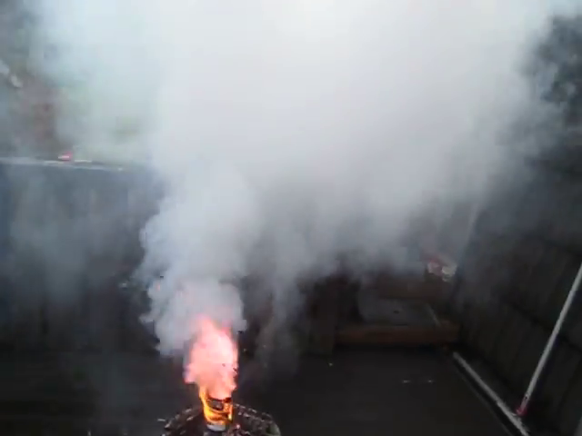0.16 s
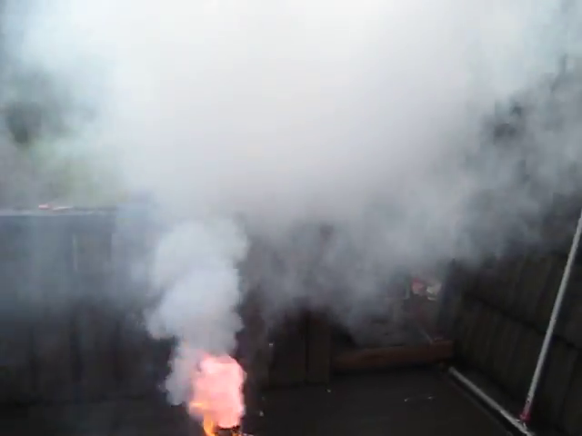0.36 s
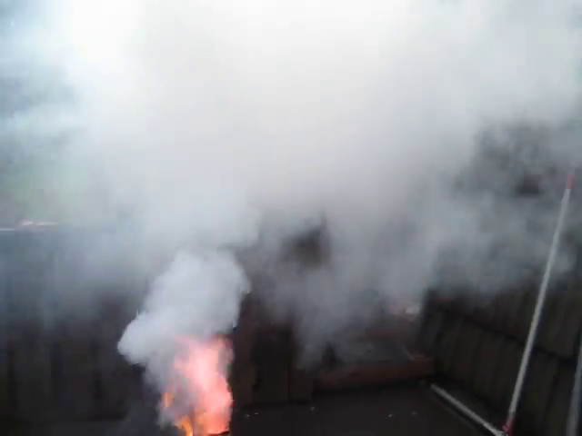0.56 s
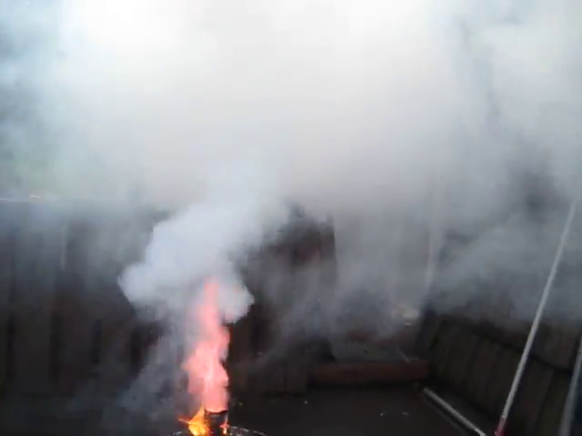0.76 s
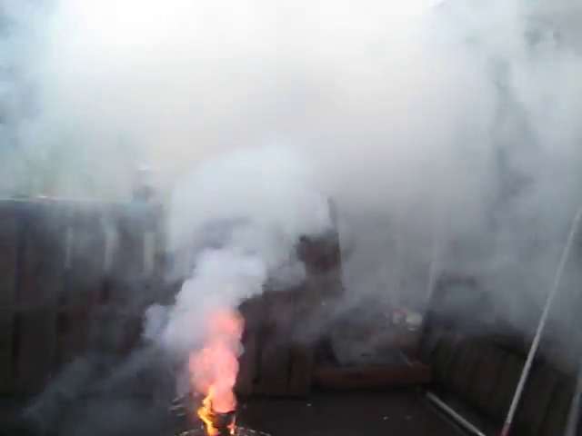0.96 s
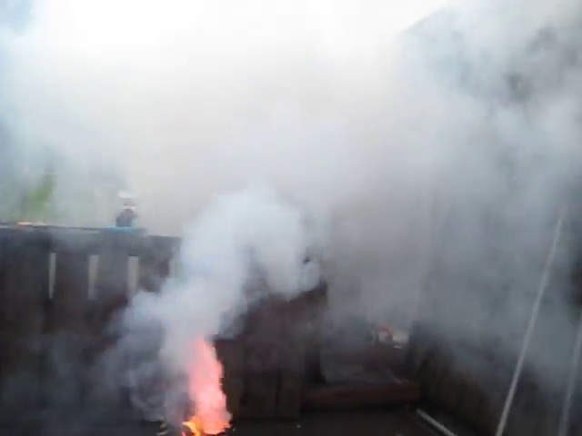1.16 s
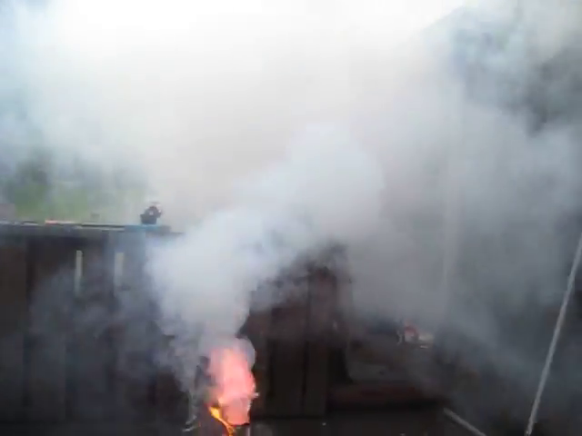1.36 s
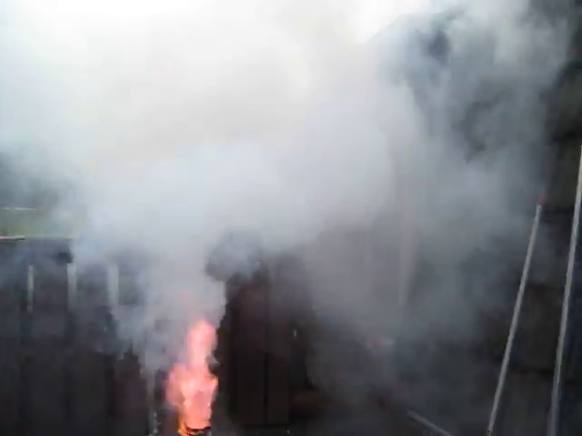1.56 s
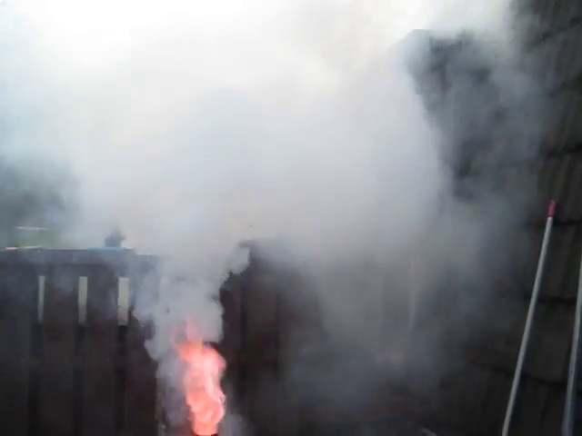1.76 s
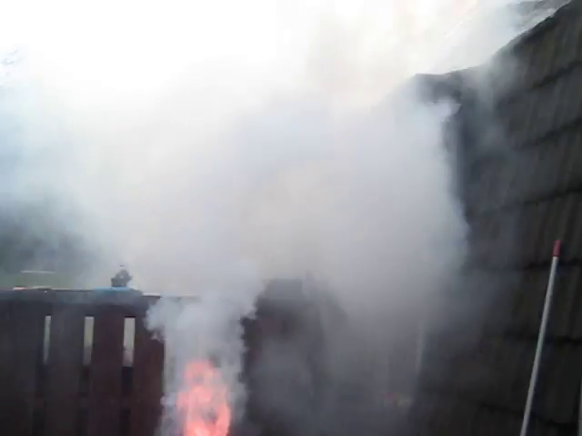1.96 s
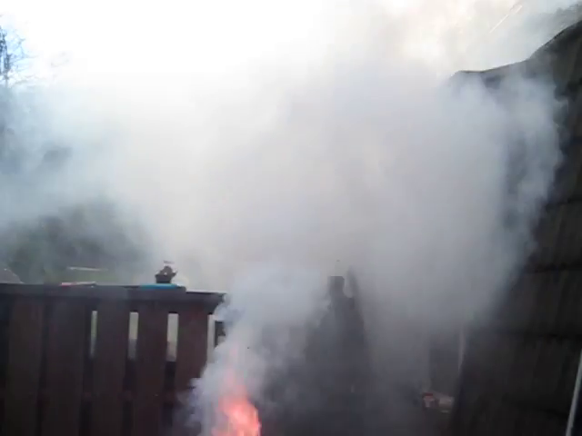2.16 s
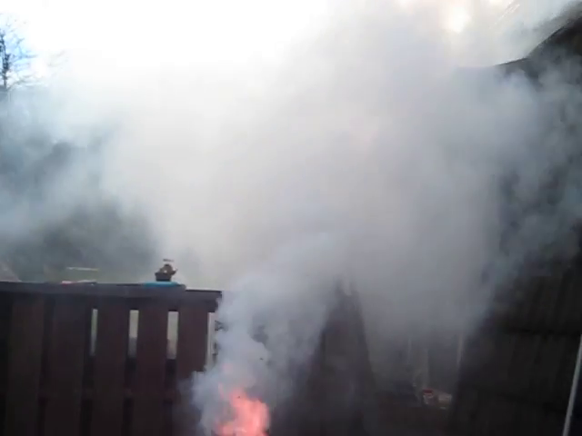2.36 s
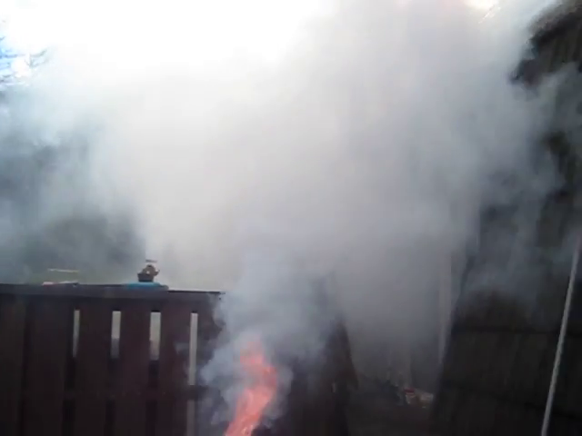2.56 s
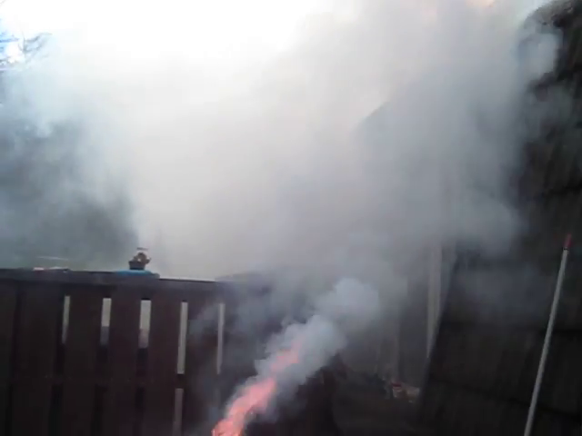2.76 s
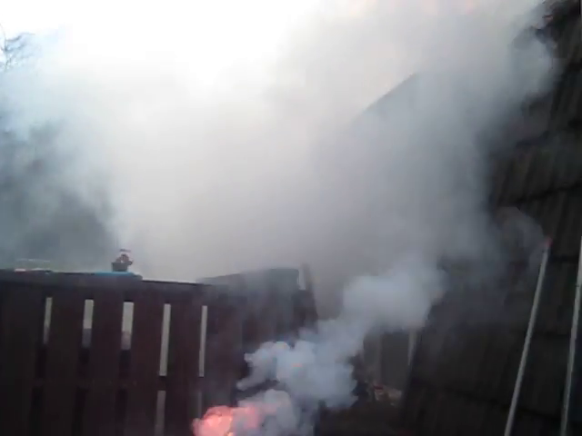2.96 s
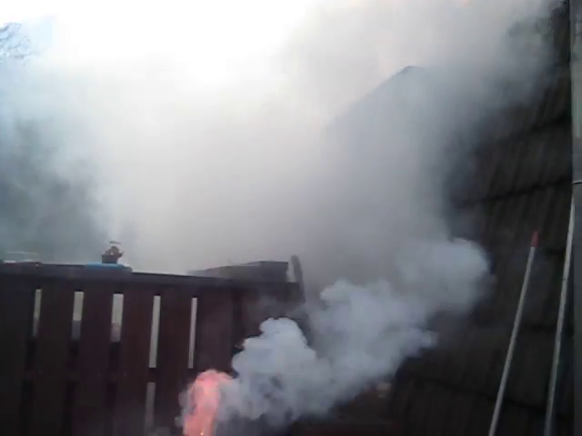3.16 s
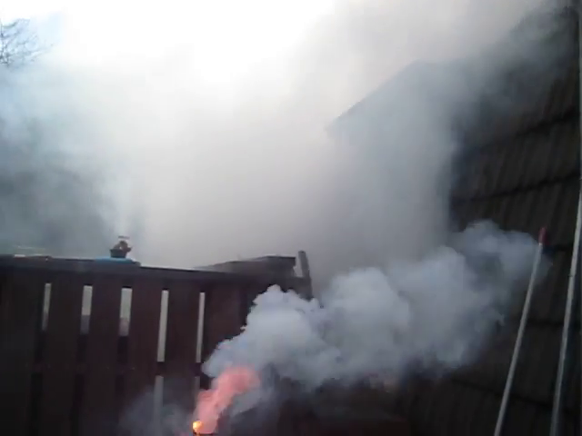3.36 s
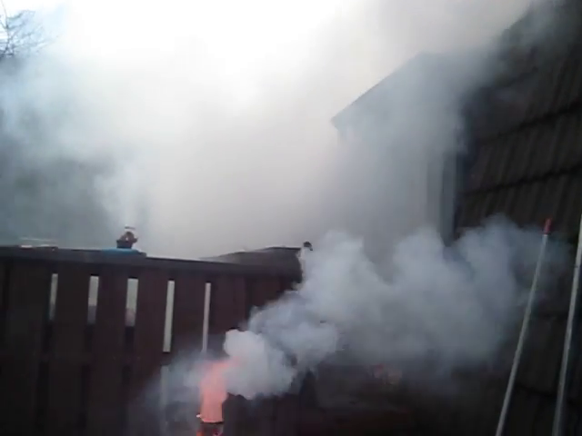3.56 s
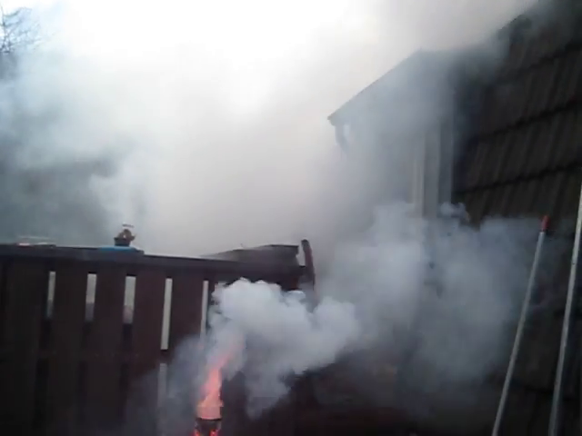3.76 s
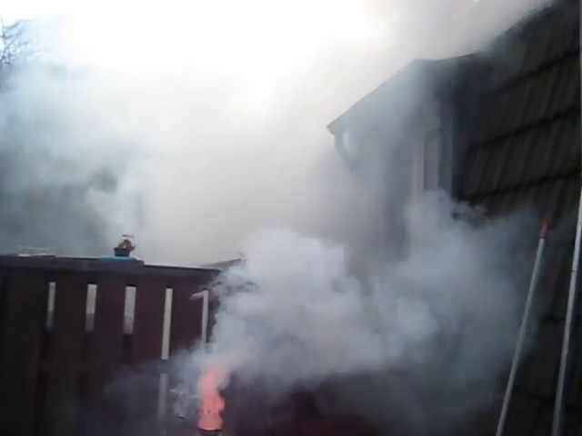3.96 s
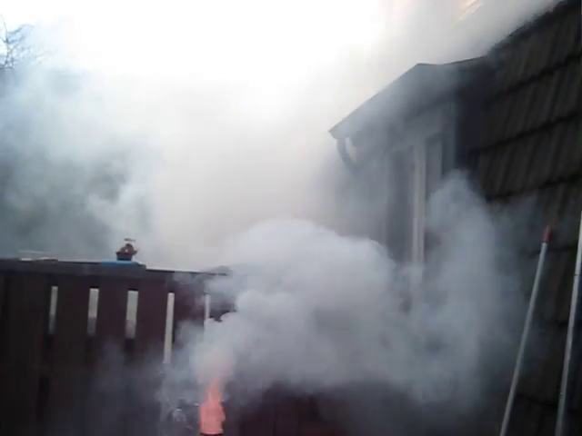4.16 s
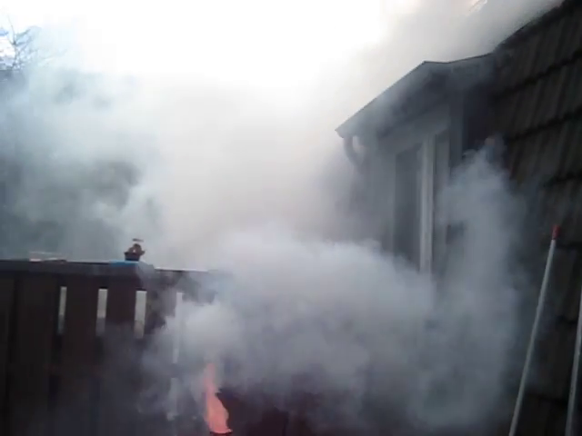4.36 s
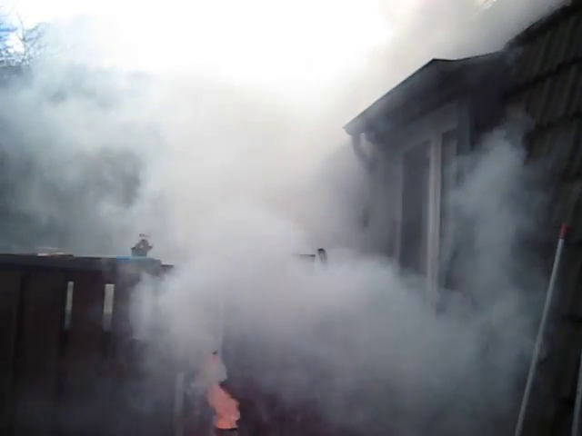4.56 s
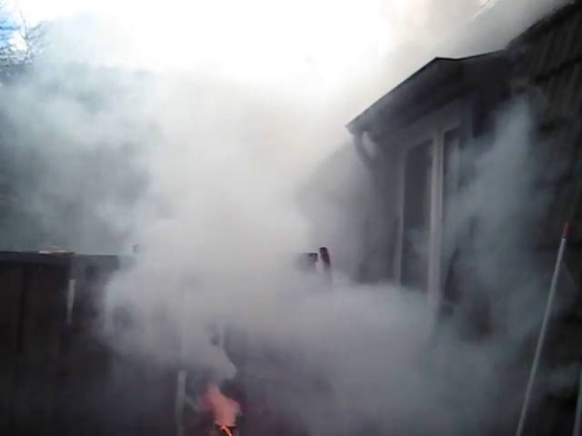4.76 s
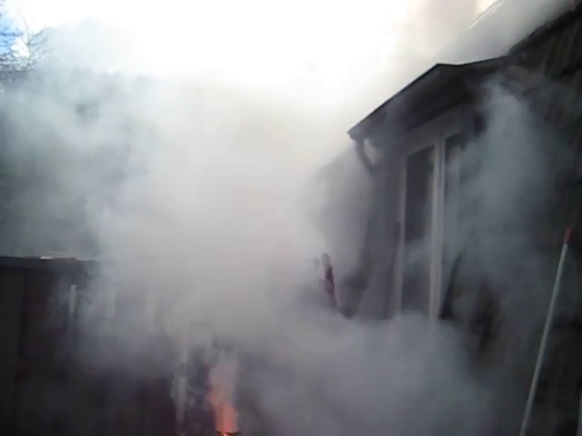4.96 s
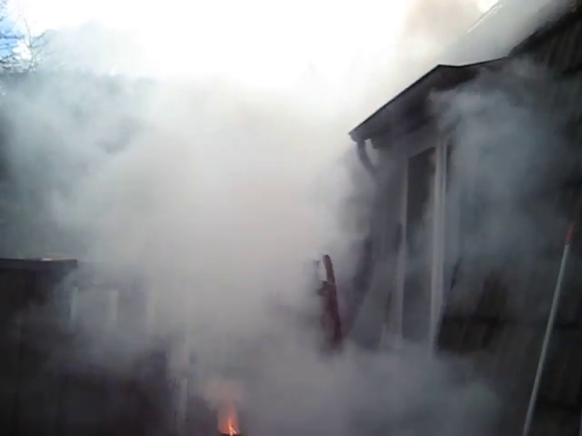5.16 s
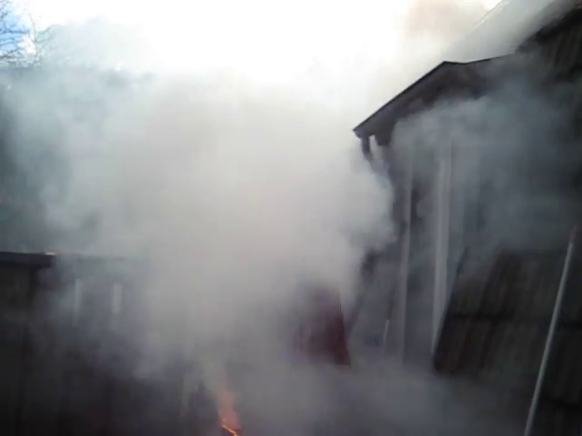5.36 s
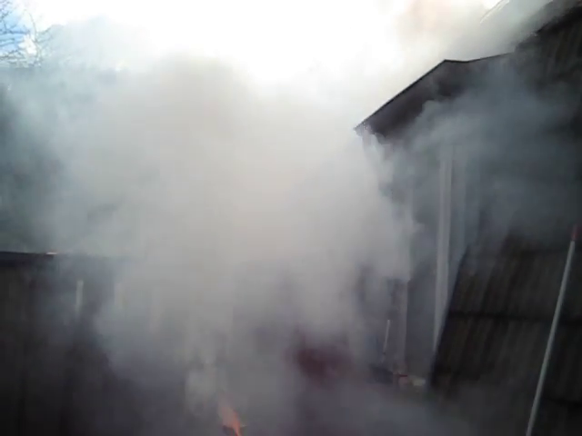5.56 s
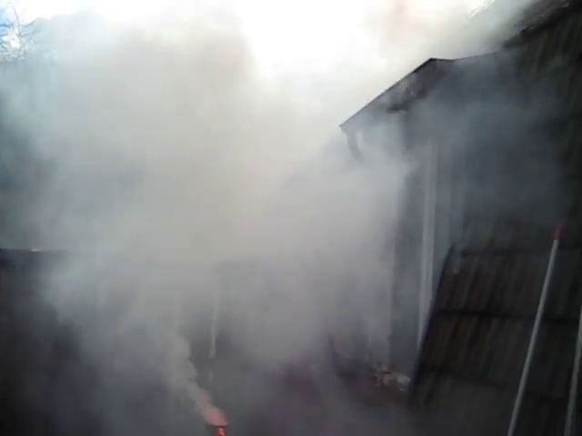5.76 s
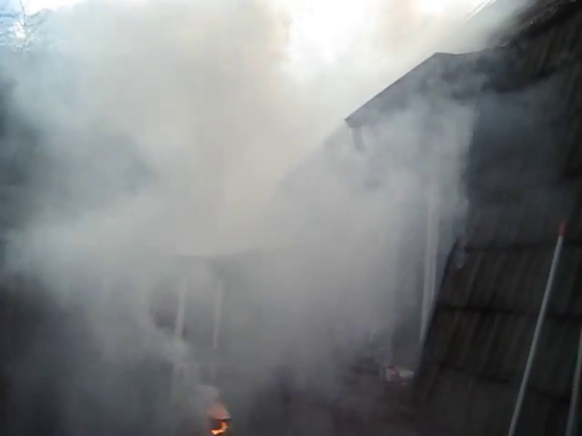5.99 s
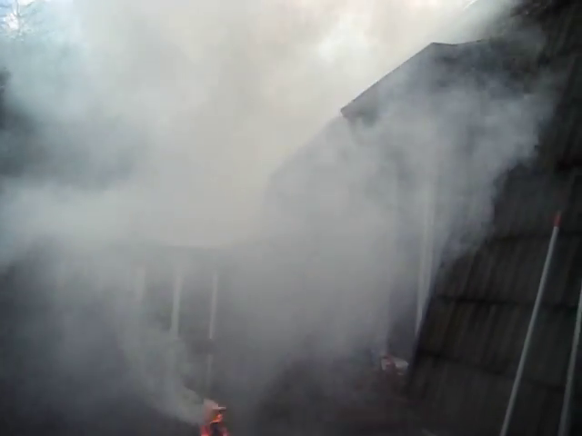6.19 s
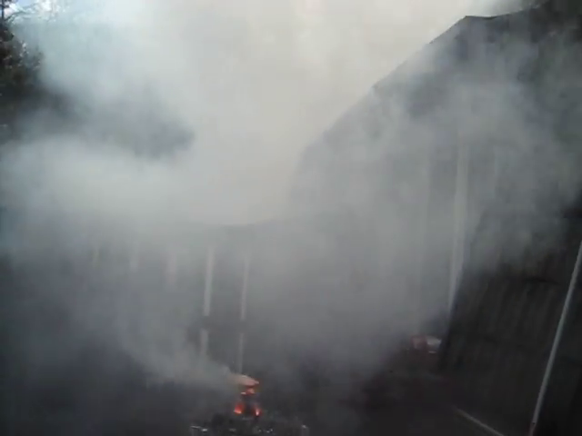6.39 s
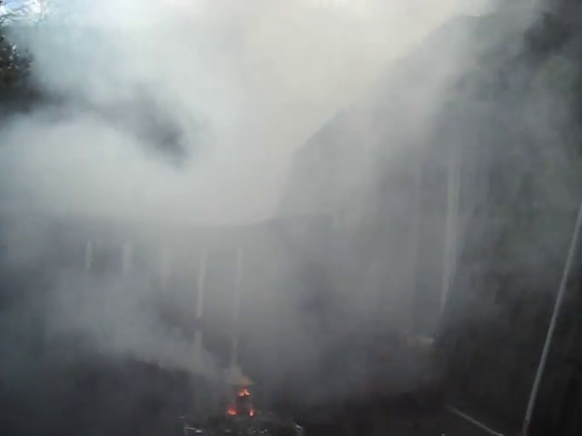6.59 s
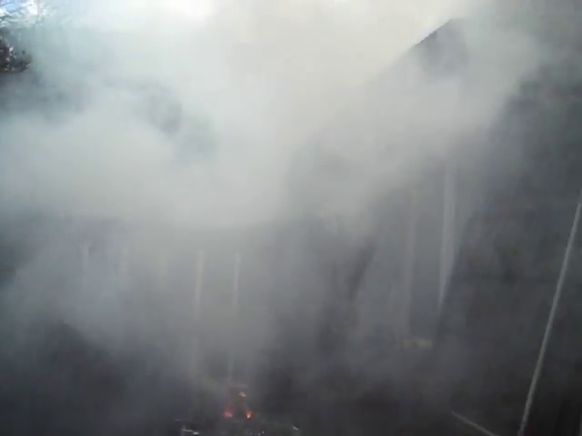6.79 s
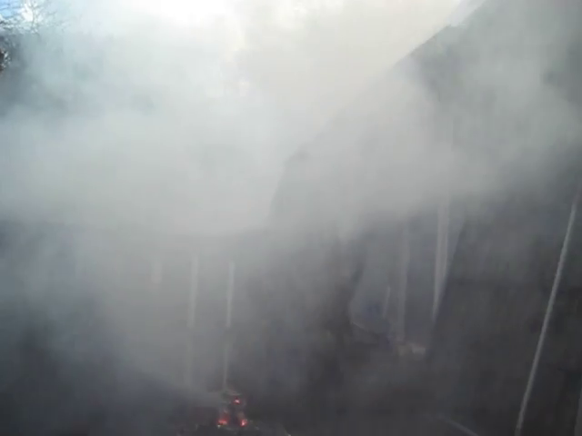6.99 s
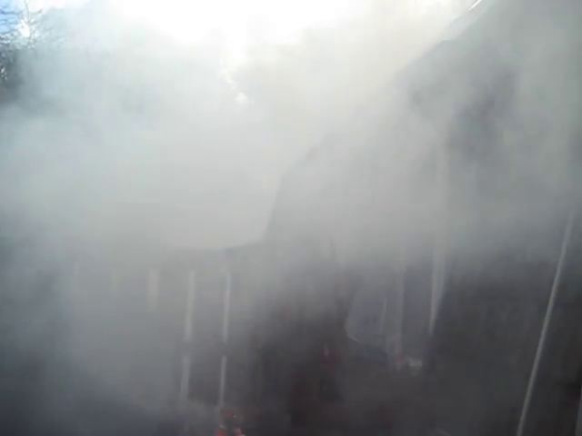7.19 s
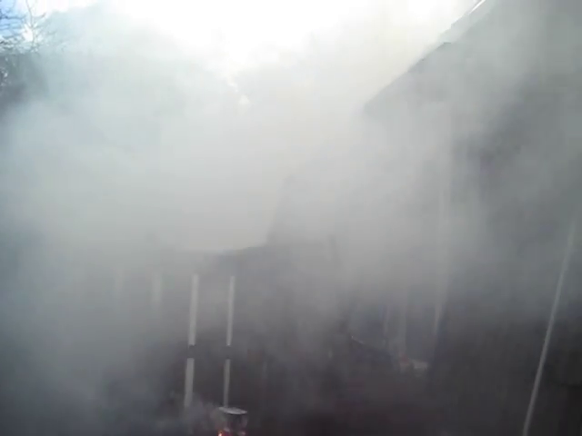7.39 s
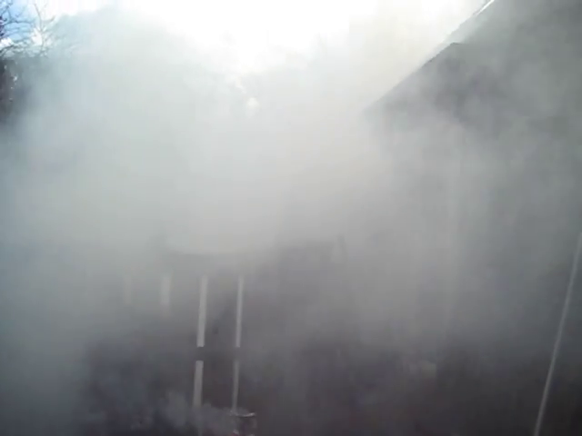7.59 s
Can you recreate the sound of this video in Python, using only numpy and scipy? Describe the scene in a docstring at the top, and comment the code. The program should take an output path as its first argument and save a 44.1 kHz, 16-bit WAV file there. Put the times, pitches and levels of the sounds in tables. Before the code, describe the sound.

Smoke mixture roars in a tin can with steady gritty hissing and hollow pops, then dies down as fingers clatter on the camera.

```python
"""A jet of hiss full of fine crackle, with single pops: a smoke mixture burns in a tin can in a small walled yard.
The jet is shaped noise plus dense tiny bursts; each pop rings a set of short modes. The flame sinks, bobs up
again and finally dies down. Floor, fence and wall throw quick echoes back. Fingers knock the hand-held camera
and ring its case; low puffs and thuds, gusts of wind and a late low creak stand over a distant hum.
The camera limits its peaks."""
import sys
import numpy as np
from scipy import signal
from scipy.io import wavfile
from scipy.ndimage import uniform_filter1d

SR = 44100
rng = np.random.default_rng(int(sys.argv[2]) if len(sys.argv) > 2 else 0)


def file_out(sig):
    """Save sig as 16-bit WAV at sys.argv[1]."""
    # one column per channel
    cols = np.atleast_2d(sig).T
    # limit, then scale
    lim = np.clip(cols, -1, 1)
    pcm = np.round(lim * 32767).astype(np.int16)
    wavfile.write(sys.argv[1], SR, pcm)


N = 336483

# finger touches on the camera: start_s, level_db, softness_db_per_octave, low_mode_weight_db
TOUCHES = [(0.3263, -18.5, 2, -6), (5.9249, 3, -5, -31), (5.9337, -10, -7, -15), (5.9383, -7, -4, -19),
           (5.95, -5, -4, -9), (5.9553, -9, -3.5, -1), (5.98, -14, -2, -17), (5.989, -17.5, 1, -2),
           (5.999, -5, 3, -21), (6.0144, -9, 0, -32), (6.0267, -21, -3, -24), (6.0738, -20.5, 10, -18),
           (6.3254, -0.7, 2, -17), (6.3394, -5.5, 1, -27), (6.347, -11, -2.5, -19), (6.3534, -15, 11, -22),
           (6.383, -10.5, 4, -7), (6.3917, -16.5, 6, -9), (6.632, -9.5, 3, -2), (6.643, -10.5, -1.5, -19),
           (6.6527, -11, 1.5, -6), (6.665, -15, 5, -10), (7.5949, -8.5, 3, -6), (7.6061, -22, 9, -2)]


def gain_of(db):
    """dB to gain."""
    return 10 ** (np.asarray(db) / 20)


def evened(x):
    """Scales to rms 1."""
    return x / np.sqrt(np.mean(x ** 2) + 1e-20)


def read(points, hz):
    """Interpolates a table over log frequency."""
    f, value = np.transpose(points)
    return np.interp(np.log(hz + 1), np.log(f + 1), value)


def add(mix, s, sound):
    """Adds a sound at time s."""
    part = mix[round(s * SR):][:len(sound)]
    part += sound[:len(part)]


def bell(x, middle, half_width):
    """Gaussian bump of height 1."""
    return np.exp(-((x - middle) / half_width) ** 2)


def band_filtered(x, order, edges, kind):
    """Butterworth filter with edges in Hz."""
    return signal.lfilter(*signal.butter(order, edges, kind, fs=SR), x)


def shaped(x, field_db, size):
    """Gives x a gain field_db(hz, s) over frequency and time."""
    overlap = size * 3 // 4
    hz, t, z = signal.stft(x, SR, nperseg=size, noverlap=overlap)
    z = z * gain_of(field_db(hz[:, None], t))
    return signal.istft(z, SR, nperseg=size, noverlap=overlap)[1][:len(x)]


def drift(shape, sizes):
    """Smooth random variation of rms 1, averaged twice along each axis given a size."""
    z = rng.standard_normal(shape)
    for axis, size in enumerate(sizes):
        z = uniform_filter1d(uniform_filter1d(z, size, axis=axis), size, axis=axis)
    return evened(z)


def ring(modes, soft_db, flip=1):
    """Sum of decaying modes; softness favours the low ones; a negative flip alternates their signs."""
    hz, mode_db, t60_s = np.transpose(modes)[:, :, None]
    t = np.arange(1800) / SR
    level = gain_of(mode_db - soft_db * np.log2(hz / 1200) - 60 * t / t60_s)
    sign_and_weight = flip ** np.arange(len(modes))[:, None]
    return (sign_and_weight * level * np.sin(2 * np.pi * hz * t)).sum(0)


def wind(lumpy_db=3.5, calm_db=-62.5, air_db=-48.5):
    """A lumpy low rumble in gusts, short sine pulses as puffs, thuds and creak, and the hum of the open air."""
    # wind rumble spectrum: pitch_hz, level_db
    rumble_spectrum = [(15, 1), (40, 1), (100, 5.5), (200, 6), (400, -4.5), (800, -51)]
    # distant outdoor hum spectrum: pitch_hz, level_db
    air_spectrum = [(15, -46), (25, -26), (199, 0.5), (264, -5), (357, -2), (469, -2), (650, -10),
                    (840, -21), (1430, -120)]
    # gusts: middle_s, half_length_s, level_db
    gust_table = [(0.046, 0.31, -43), (0.368, .2, -40.5), (1.3, 0.79, -52), (2.196, 0.32, -45),
                  (2.9, 0.36, -49), (3.55, 0.19, -57), (6.35, .15, -47)]
    # low puffs and thuds; from 6.15 to 6.24 s a low creak: start_s, level_db, pitch_hz, length_cycles
    low_pulses = [(0.241, -22, 109, 1.2), (0.471, -22, 170, 1.2), (.568, -27, 106, 2.4),
                  (1.359, -32, 80.7, 1), (2.08, -28, 170, 1.9), (2.158, -28, 180, .98),
                  (2.248, -26, 148, 1.2), (2.949, -28, 135, 1.1), (3.217, -28, 128, 0.87),
                  (6.149, -29, 231, 1.1), (6.188, -26, 144, 1.2), (6.207, -21, 182, 3.8),
                  (6.2278, -18.5, 260, 1.2), (6.233, -17.5, 151, 1.2)]
    t = np.arange(N) / SR
    rumble = evened(shaped(rng.standard_normal(N), lambda hz, t: read(rumble_spectrum, hz), size=4096))
    lumps = drift(N, [900])
    gusts = gain_of(calm_db) + sum(gain_of(db) * bell(t, mid, half) for mid, half, db in gust_table)
    out = rumble * gusts * gain_of(lumpy_db * lumps)
    hum = evened(shaped(rng.standard_normal(N), lambda hz, t: read(air_spectrum, hz), size=2048))
    out += gain_of(air_db) * hum
    for s, db, hz, cycles in low_pulses:
        turns = np.arange(0, cycles, hz / SR)
        add(out, s, gain_of(db) * np.sin(2 * np.pi * turns) * np.sin(np.pi * turns / cycles))
    return out


def jolts(jolt_db=-25, per_soft_db=1.88, jolt_s=.0012):
    """Each touch shakes the microphone itself: one low push and return, no ring, stronger for a soft touch."""
    out, u = np.zeros(N), np.arange(0, 8, 1 / (jolt_s * SR))
    push = u * np.exp(1 - u) * (1 - u / 2)
    for s, db, soft_db, _ in TOUCHES:
        add(out, s, gain_of(db + jolt_db + per_soft_db * soft_db) * push)
    return out


def knocks(crack_db=-21.0, scrape_db=-13.0, scrape_decay_s=.002, crack_decay_s=.00041):
    """Each touch is a blow with a scraping trail that rings the plastic case, plus a short noisy crack."""
    # case modes: pitch_hz, level_db, t60_s
    case_modes = [(332, 10, 0.014), (473, 15, 0.033), (625, -10.5, 0.0071), (870, -3, 0.014),
                  (910, 10, 0.018), (1170, 2.5, 0.018), (1660, 1, 0.0056), (2566, -9, 0.029),
                  (3650, -3.5, 0.0048), (4300, -3, 0.0059), (4560, -2.5, 0.0017)]
    out, t = np.zeros(N), np.arange(600) / SR
    noises = rng.standard_normal((len(TOUCHES), 600))
    for (s, db, soft_db, weight_db), noise in zip(TOUCHES, noises):
        touch = (t == 0) + gain_of(scrape_db) * noise * np.exp(-t / scrape_decay_s)
        # the grip weights the lowest modes
        modes = [(hz, mode_db + weight_db * (hz < 700), t60_s) for hz, mode_db, t60_s in case_modes]
        sound = np.convolve(touch, ring(modes, soft_db, flip=-1.07))
        sound = gain_of(db) * sound / abs(sound).max()
        crack = gain_of(db + crack_db - 2.1 * soft_db) * noise * np.exp(-t / crack_decay_s)
        add(sound, 0, crack)
        add(out, s, sound)
    return out


def yard(x, wet_db=-3.5, wall_ms=5.3, wall_share=0.34):
    """One clear slap from the wall, then sparse taps of random sign, each band dying at its own speed."""
    # yard decay: pitch_hz, t60_s
    decay_times = [(300, 0.79), (1000, 0.1), (3000, 0.17), (8000, 0.14), (16000, 0.15)]
    taps = np.zeros(SR // 2)
    at = np.arange(320, len(taps) - 20, 20)  # one tap in every 20 samples
    taps[at + rng.integers(0, 20, len(at))] = rng.choice([-1., 1.], len(at))
    tail = shaped(taps, lambda hz, t: -60 * t / np.maximum(read(decay_times, hz), .02), size=256)
    slap = wall_share * np.sinc(np.arange(len(tail)) - wall_ms * SR / 1000)
    response = gain_of(wet_db) * tail / np.linalg.norm(tail) + slap
    return signal.fftconvolve(x, response)[:N]


def near_echoes(x, echo_hz=6000, bottom_ms=0.373):
    """Floor, can bottom, fence and wall send back delayed, duller copies."""
    # shortest echoes, shifting as the camera moves: time_s, floor_ms, floor_share, can_bottom_share
    moving_paths = [(0, 1.18, .15, 0.064), (.65, 0.92, 0.1, 0.13), (.8, 1.48, 0.16, 0.067),
                    (1.35, 1.18, 0.17, -0.013), (1.7, 1.18, 0.16, -0.14), (2.3, 1.12, 0.28, 0.082),
                    (3.3, 1, 0.15, 0.19), (3.9, 1.047, 0.15, 0.059), (5.8, 1.064, 0.15, -0.12),
                    (6.4, 1.01, .22, -0.17), (7.63, 0.87, 0.32, -0.2)]
    # fence and wall: delay_ms, pressure_share
    fixed_paths = [(5.85, -0.0084), (6.58, -0.063), (6.8, 0.22), (7.01, -0.15), (7.96, -0.16),
                   (8.12, 0.061), (9.14, 0.0077), (10.41, -0.31), (10.6, 0.03), (12.05, 0.1)]
    s, *columns = np.transpose(moving_paths)
    t = np.arange(N) / SR
    floor_ms, floor_share, bottom_share = (np.interp(t, s, c) for c in columns)
    copies = floor_share * np.interp(t - floor_ms / 1000, t, x)
    copies += bottom_share * np.interp(t - bottom_ms / 1000, t, x)
    for ms, share in fixed_paths:
        copies += share * np.interp(t - ms / 1000, t, x)
    return x + band_filtered(copies, 1, echo_hz, "lowpass")


def pops(small_count=14, small_from_s=5.5, small_db=-28, small_spread_db=1, small_soft_db=6.0, small_spit_db=-21):
    """Each burst rings short modes with a spit of noise; faint random pops come late as the fire dies."""
    # pops in the can, and at 5.998 s a sharp tick on the camera case:
    # start_s, level_db, softness_db_per_octave, spit_db
    pop_table = [(0.125, -10, -12, -3), (0.1761, 3, -5, -31), (0.218, -9, -11, -1), (.268, -19, -7, -20),
                 (.307, -10, -8, -3), (.461, -21, -8, -7.5), (0.538, -14, -1, -8), (.572, -10, -12, -2),
                 (.677, -8, 1, -1), (.685, -15, -1, -12.5), (.717, -9.5, -9, -2), (.948, -3.5, -6, -8),
                 (1.093, -7, -3, -7.5), (1.165, 0, -16, -15), (1.197, -22, -17, 12.5),
                 (1.667, -17, -19, 5.5), (1.887, -5.5, -1, -6), (2.309, -9.5, -7, -2.5),
                 (3.124, -4, -20, -3.5), (5.548, -10, 5, -25), (5.648, -17, 2, -21),
                 (5.678, -10.5, 12, -26), (5.72, -14.5, 16, -24), (5.816, -17.5, 29, -25),
                 (5.998, -6.5, 2, -3.5), (6.422, -8, -3, -17.5), (6.523, -18, 12, -15.5),
                 (6.536, -6, 7, -37), (6.725, -10, -7, -10), (6.749, -16.5, 9, -27), (6.806, -16, 13, -30),
                 (6.811, -18, 7, -27), (6.879, -14, 10, -29), (6.925, -15, 8, -18), (6.945, -15, .1, -25),
                 (6.956, -15.5, 21, -31), (6.972, -21, 28, -30), (7.017, -15, 4, -24),
                 (7.026, -7.5, 1, -24), (7.093, -18, 9, -18.5), (7.106, -13, 10, -18.5),
                 (7.178, -15, .1, -29), (7.186, -15.5, 18, -23), (7.197, -10, 3, -15), (7.302, -9, 6, -42),
                 (7.345, -25, 28, -24), (7.399, -23, 17, -27), (7.45, -6.5, 4, -26), (7.57, -6, 1, -35)]
    # air in the can: pitch_hz, level_db, t60_s
    can_modes = [(1127, -10.5, 0.013), (1840, 6, 0.0071), (2830, 13, 0.002), (3650, 3, 0.0059),
                 (5000, 8, 0.0017), (6020, 4, 0.0031)]
    out, t = np.zeros(N), np.arange(1800) / SR
    small = [(small_from_s + u * (N / SR - small_from_s),
              small_db + small_spread_db * (2 * v - 1),
              small_soft_db * (4 * w - .5),
              small_spit_db) for u, v, w in rng.random((small_count, 3))]
    bursts = small + pop_table
    noises = rng.standard_normal((len(bursts), 1800))
    spits = evened(band_filtered(noises, 2, [5500, 12500], "bandpass"))
    fade = np.exp(-t / .0013)
    for (s, db, soft_db, spit_db), spit in zip(bursts, spits):
        swing = band_filtered(ring(can_modes, soft_db), 3, [750, 7800], "bandpass")
        swing = swing / abs(swing).max()
        add(out, s, gain_of(db) * (swing + gain_of(spit_db) * spit * fade))
    return out


def jet(patchy_db=1.0, flicker_db=0.41, sputter_db=0.63, band_db=0.9, spread_db=5.5, per_s=1500, flare_body=.25):
    """Gas noise plus dense tiny bursts, coloured by the can as the flame sinks, bobs up again and dies down."""
    # burning jet: time_s, level_db, treble_offset_db
    burn = [(0, -15, 0.5), (.35, -17.5, 1), (.7, -19, 2.5), (.85, -15.5, -1), (1.9, -14, -3),
            (2.76, -14, -2), (2.87, -14.5, -5), (3.3, -14.5, -3), (3.6, -15, -0.5), (4.15, -14.5, -2),
            (4.6, -16, -3), (5.1, -19, -2.5), (5.5, -19, -2), (5.85, -19, 0), (6.05, -20, -1),
            (6.5, -21.5, -0.5), (6.75, -25.5, 0), (7.63, -29.5, -0.5)]
    # crackle against the hiss: time_s, level_db
    crackle = [(0, -5), (2, -13), (4, -11), (5.5, -9), (6.5, -11), (7.63, 1.5)]
    # flame position: time_s, stage (0 above the can, 1 inside, 2 dying)
    flame_stage = [(0.7, 0.02), (1.5, 0.53), (2.3, 0.78), (3.2, 0.42), (4.6, 1.05), (5.6, 1.49),
                   (6.3, 2.18)]
    # hiss spectrum, flame above the can: pitch_hz, level_db
    hiss_above = [(150, -45), (250, -14.5), (564, -7), (841, -4.5), (982, -1.5), (1050, 2), (1340, -0.5),
                  (1620, 1), (2980, -1), (3420, 2), (11500, -9.5), (15700, -17.5)]
    # hiss spectrum, flame sunk into the can: pitch_hz, level_db
    hiss_inside = [(150, -52), (250, -18), (443, -9), (564, -16.5), (707, -4), (855, -5), (933, -2.5),
                   (1410, -3), (1860, -3.5), (2500, -3), (4750, -5.5), (5460, -6), (10500, -9),
                   (13900, -15.5), (15700, -26)]
    # hiss spectrum, flame dying down: pitch_hz, level_db
    hiss_dying = [(150, -44), (250, -9), (372, -4), (812, -6.5), (1170, -1.5), (1300, -3.5), (1740, -6.5),
                  (2260, -7.5), (2730, -8.5), (5180, -13), (5750, -10), (10400, -15.5), (15700, -31)]
    # can resonances on the sunken flame: pitch_hz, width_hz, rise_db
    sunk_peaks = [(1080, 59, 4.5), (1854, 260, 4), (3680, 140, 2.5), (4720, 125, 3.5)]
    # can resonances on the high flame: pitch_hz, width_hz, rise_db
    open_peaks = [(1300, 104, 4), (2900, 190, 3)]
    # spurts of brighter sizzle: middle_s, half_length_s, treble_rise_db
    flares = [(0.21, 0.024, 2), (0.466, 0.0071, 10), (.55, .03, 2.5), (1.892, 0.0084, 7),
              (1.95, 0.017, 1.5), (3.545, 0.027, 3), (4.448, 0.032, 3.5), (4.86, 0.042, 5.5),
              (5.2, 0.043, 7.5), (5.338, 0.073, 7.5), (5.704, 0.012, 5)]
    s, burn_db, treble_db = np.transpose(burn)
    t = np.arange(N) / SR
    struck = rng.random(N) < per_s / SR
    bursts = gain_of(spread_db * np.minimum(rng.exponential(1, N), 3)) * struck
    bursts = evened(bursts * rng.standard_normal(N)) * gain_of(np.interp(t, *np.transpose(crackle)))

    def field_db(hz, at):
        """Gain of the jet over frequency and time."""
        sunk = np.clip(np.interp(at, *np.transpose(flame_stage)), 0, 2)
        stages = enumerate([hiss_above, hiss_inside, hiss_dying])
        colour_db = sum(np.clip(1 - abs(sunk - k), 0, 1) * read(stage, hz) for k, stage in stages)
        high = np.clip(np.log2((hz + 1) / 4200), 0, 1)  # share of sizzle
        level_db = np.interp(at, s, burn_db) + high * np.interp(at, s, treble_db)
        flare_db = sum(db * bell(at, mid, half) for mid, half, db in flares)
        level_db += (flare_body + (1 - flare_body) * high) * flare_db  # the body gets only a share
        sputter = drift((len(at), 2), (7,)).T
        level_db += sputter_db * (sputter[0] + high * sputter[1])
        patches = drift((len(at), len(hz)), (6, 5)).T
        flicker = drift((len(at), len(hz)), (4, 120)).T
        bands_db = band_db * drift((len(at), len(hz)), (70, 3)).T  # slow, narrow
        bands_db += np.minimum(1.4 * sunk, 1) * sum(db * bell(hz, f, w) for f, w, db in sunk_peaks)
        bands_db += np.clip(1 - 1.1 * sunk, 0, 1) * sum(db * bell(hz, f, w) for f, w, db in open_peaks)
        return colour_db + level_db + bands_db + patchy_db * patches + flicker_db * flicker
    return shaped(rng.standard_normal(N) + bursts, field_db, size=512)


def scene():
    """One faintly hissing microphone feeds both channels; its port passes little bass from can and case."""
    bursts = pops()
    fire = near_echoes(jet() + bursts) + yard(bursts)
    mono = band_filtered(fire + knocks(), 3, 300, "highpass") + jolts() + wind()
    mono += gain_of(-53) * np.diff(rng.standard_normal(N + 1))  # microphone hiss, rising with frequency
    return np.array([mono, mono])


def record(dry, threshold_db=-9.0, recovery_db_per_s=160.0, clip_level=.68, edge_hz=15720):
    """A limiter drops the gain after each high peak and recovers quickly; the highest peaks clip; band limit."""
    peak_db = 20 * np.log10(abs(dry[0]) + 1e-9)
    fall_db = np.arange(N) * recovery_db_per_s / SR
    held_db = np.maximum.accumulate(peak_db + fall_db) - fall_db
    over_db = np.maximum(held_db - threshold_db, 0)
    late_db = signal.lfilter([.015], [1, -.985], over_db)  # the gain lags by about 1.5 ms
    limited = np.clip(dry / gain_of(.6 * late_db), -clip_level, clip_level)
    lowpass = signal.firwin(511, edge_hz, window=("kaiser", 9), fs=SR)
    return signal.oaconvolve(limited, lowpass[None], "same")


dry = scene()
out = record(dry)
file_out(out)
```